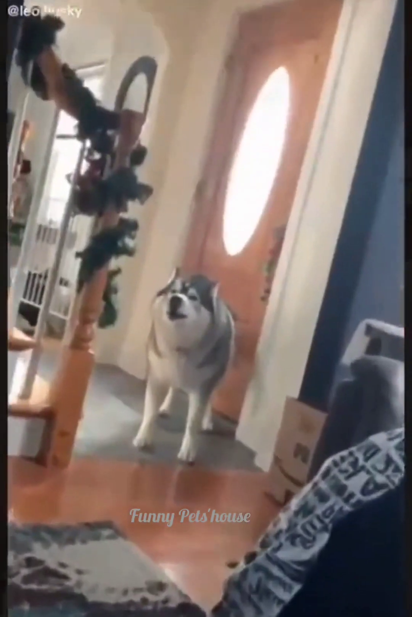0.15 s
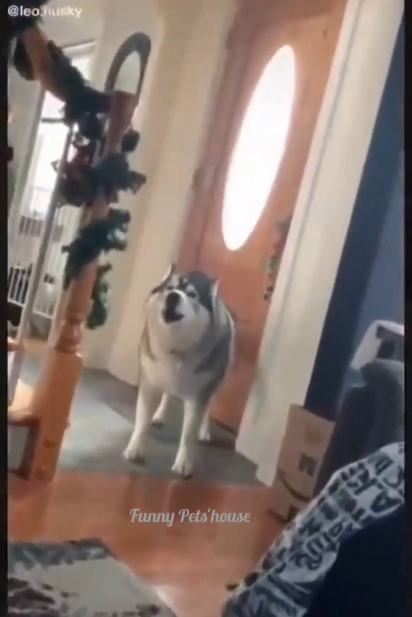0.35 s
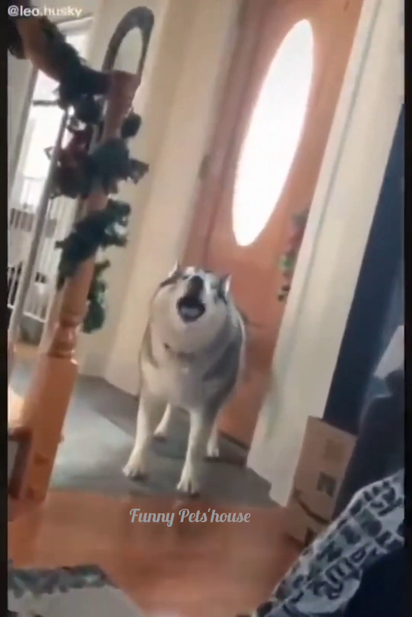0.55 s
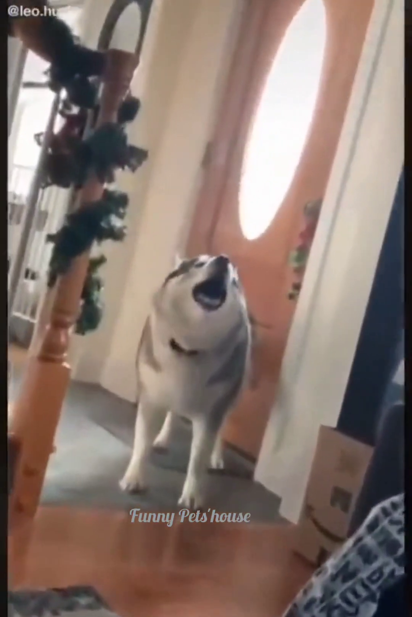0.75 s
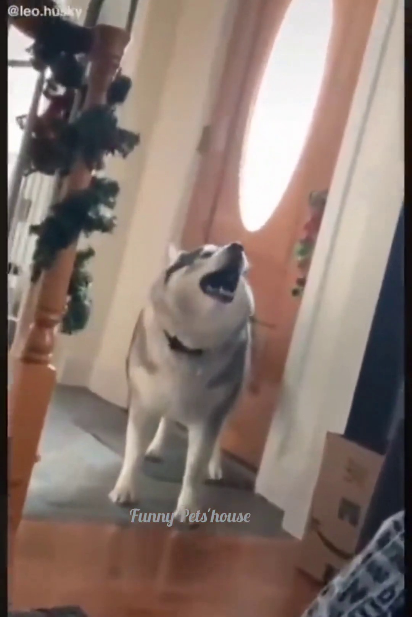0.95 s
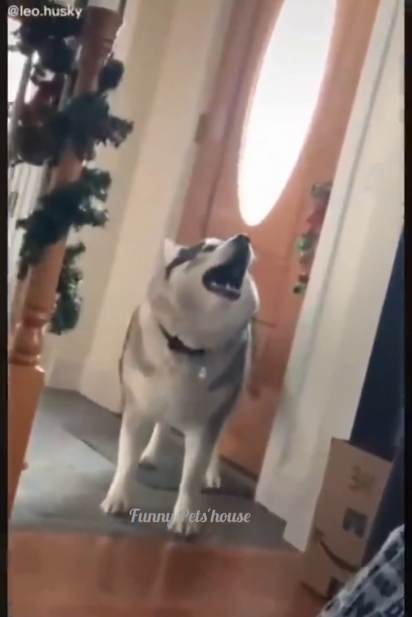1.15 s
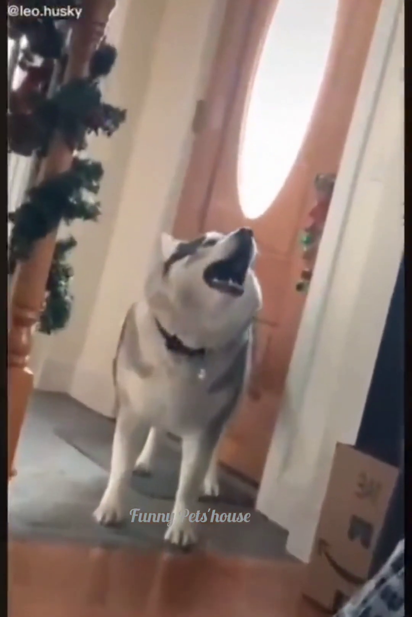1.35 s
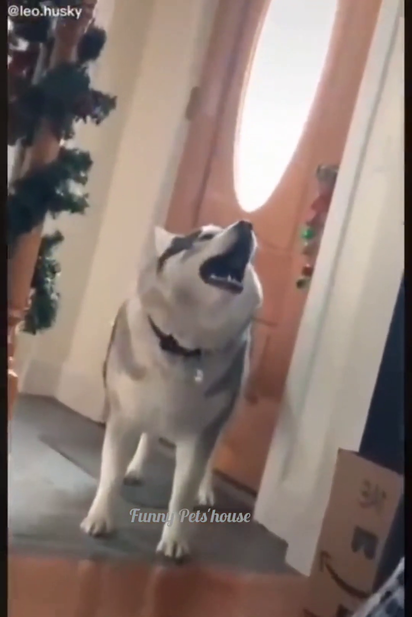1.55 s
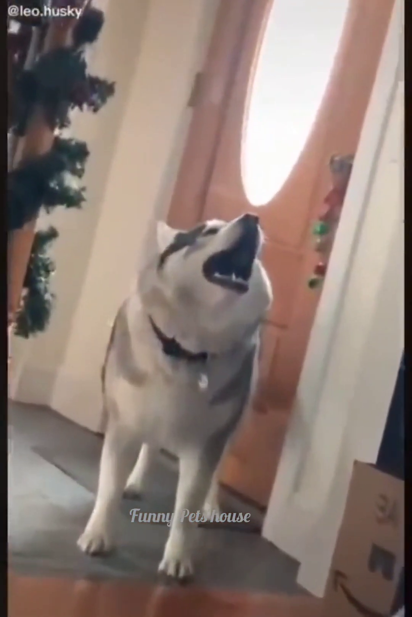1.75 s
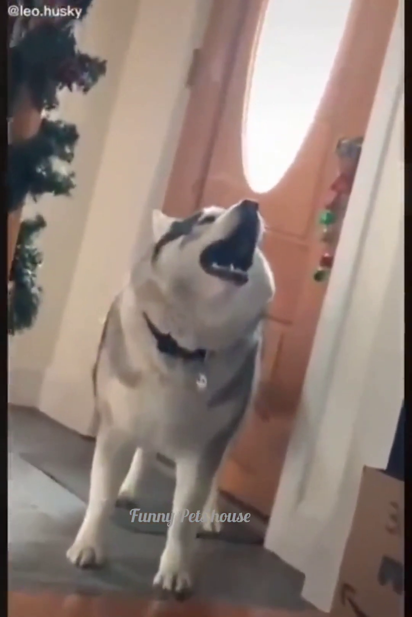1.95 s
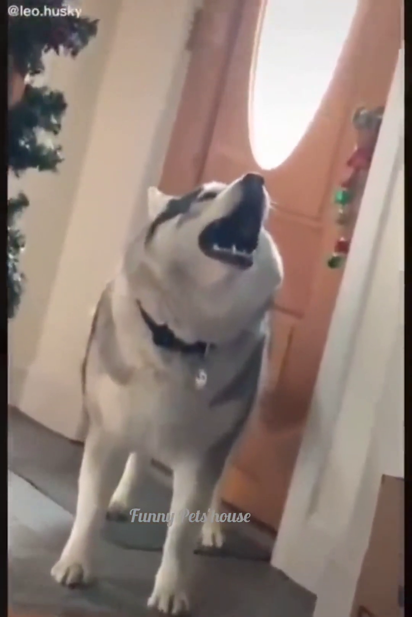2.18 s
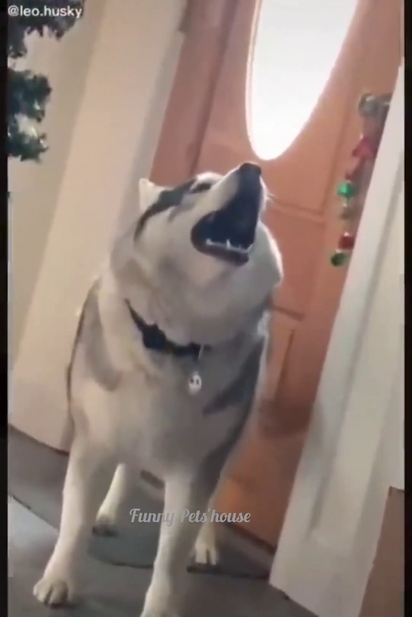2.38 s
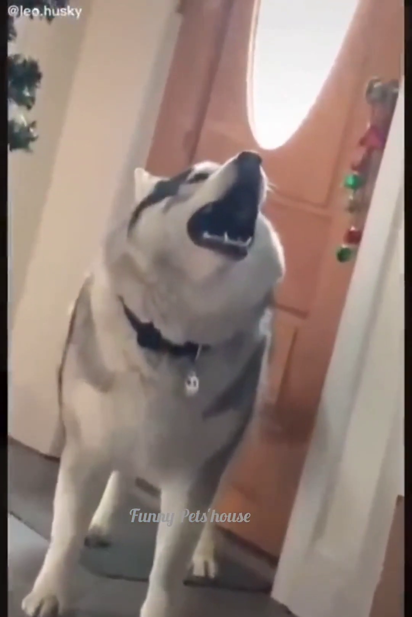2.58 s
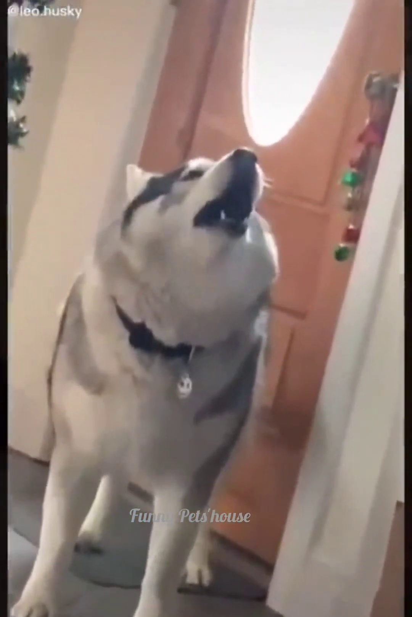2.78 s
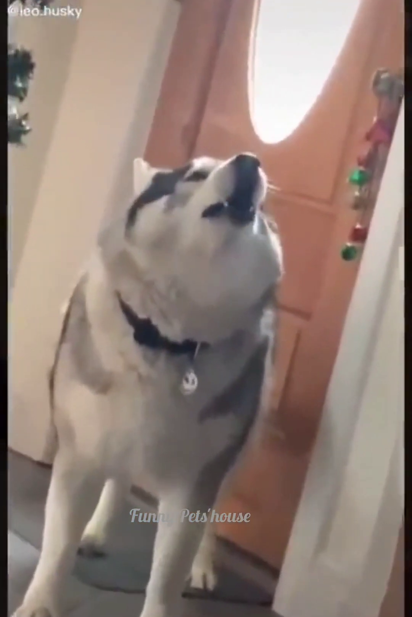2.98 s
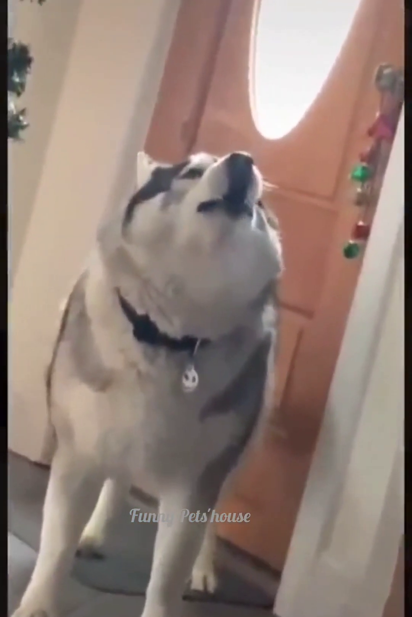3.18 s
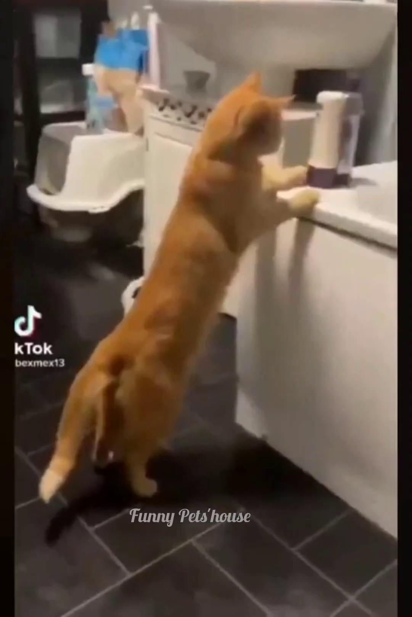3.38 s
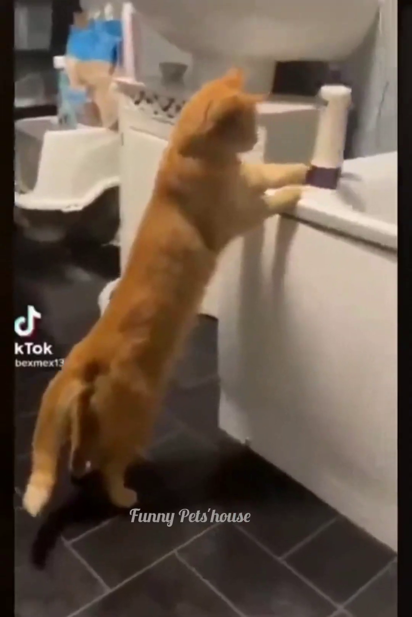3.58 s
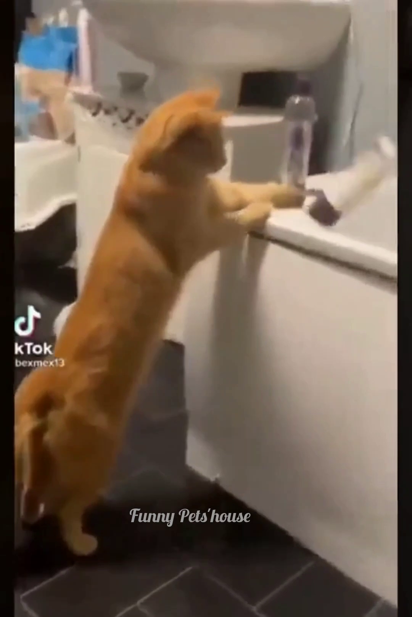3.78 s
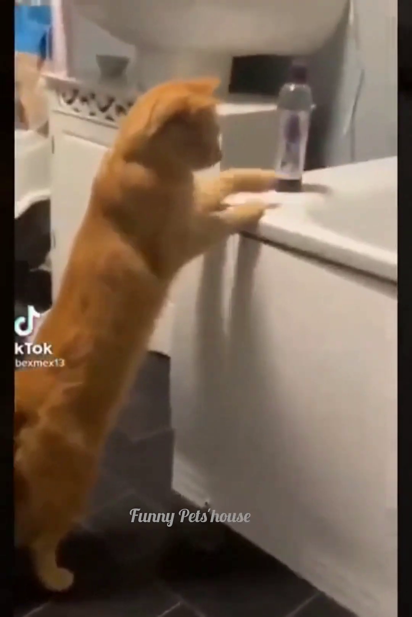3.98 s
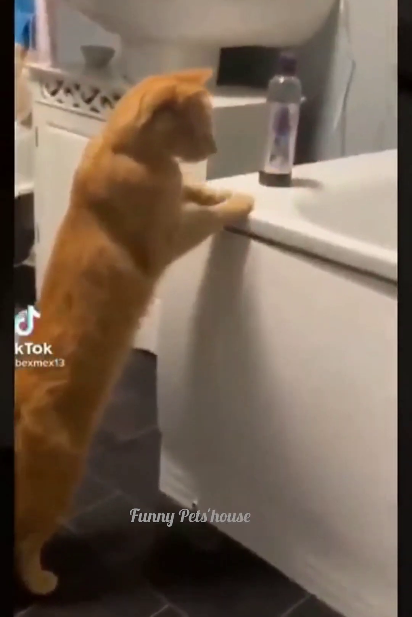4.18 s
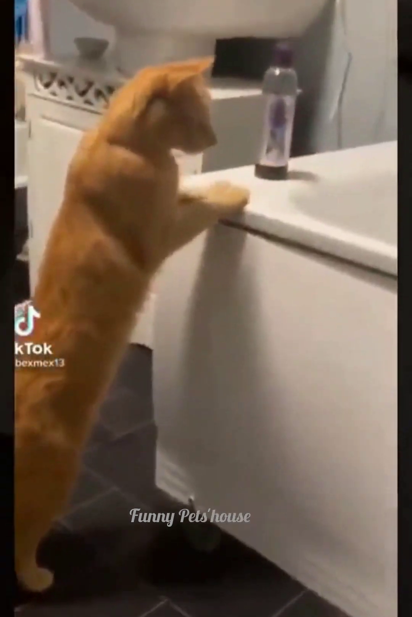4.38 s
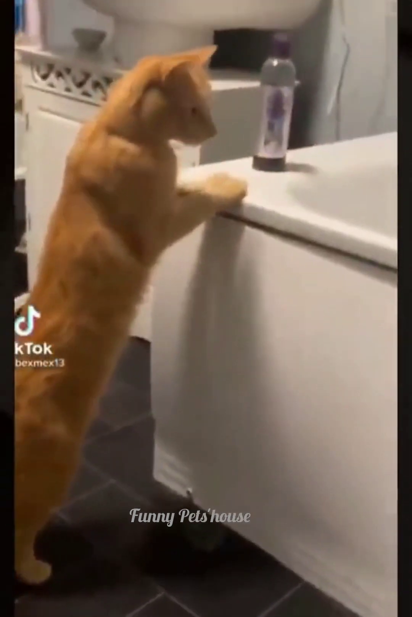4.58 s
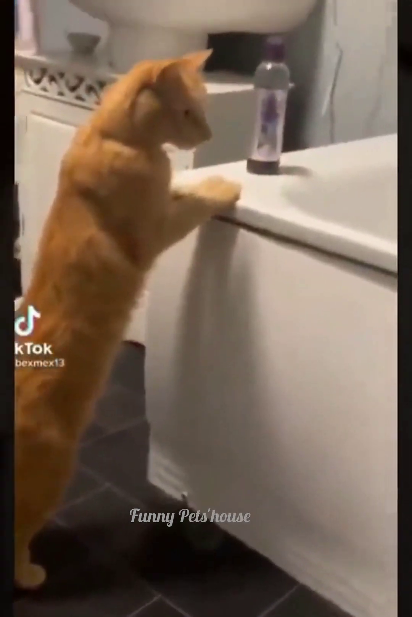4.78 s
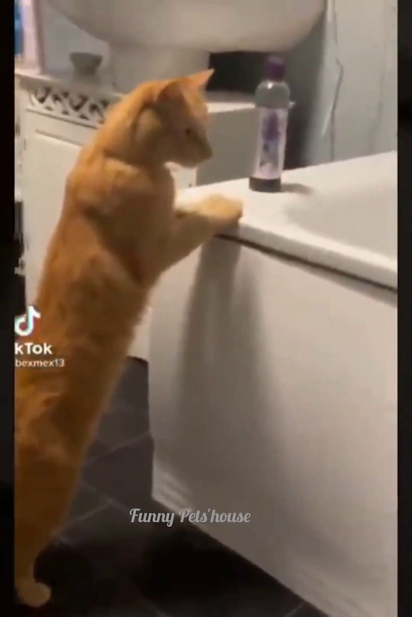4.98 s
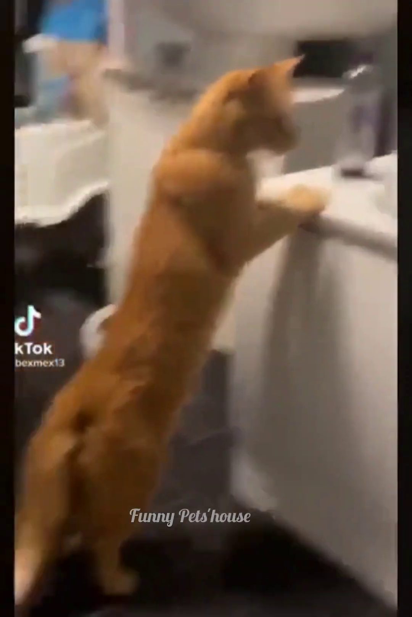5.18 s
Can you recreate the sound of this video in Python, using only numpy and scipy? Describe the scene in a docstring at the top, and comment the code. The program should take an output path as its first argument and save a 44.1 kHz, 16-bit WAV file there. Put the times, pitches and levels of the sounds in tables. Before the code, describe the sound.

Fairly close mono pickup indoors: a husky's low, wavering moan scoops up into a long, clear, almost whistling howl, slightly hoarser near the end, cracking and falling away. After a hard cut there is near silence and a faint scrape, then a sudden double bang as a plastic bottle hits a bathtub, a short resonant boom, more knocks and a fading hollow rattle.

```python
"""A husky in a hallway starts on a low moan, breaks up into one long, clear howl, cracks once and drops off.
Its voice is a stack of sine waves (partials) with shaped levels, plus breath noise and a hall echo.
Then, in a bathroom, a cat pushes a plastic bottle off the rim of a bathtub: it slides (uneven noise),
crashes into the hollow tub (noise bursts and fading tones), bounces and rolls about while the tub booms."""
import sys
import numpy as np
from scipy import signal
from scipy.fft import rfft, irfft, next_fast_len
from scipy.io import wavfile
from scipy.ndimage import map_coordinates

SR = 44100
rng = np.random.default_rng(int(sys.argv[2]) if len(sys.argv) > 2 else 0)


def transcribe(signal):
    """Save signal, clipped to [-1, 1], as a 16-bit WAV file at the path in sys.argv[1]."""
    frames = np.atleast_2d(signal).T
    limited = np.clip(frames, -1, 1)
    pcm = np.round(limited * 32767).astype(np.int16)
    wavfile.write(sys.argv[1], SR, pcm)


N = 231026
TIME = np.arange(N) / SR  # seconds
MOAN_START_S, HOWL_START_S, HOWL_END_S = 0.24, 0.594, 3.011

# Low noise of thuds and of the bathroom's rumble. Each row: frequency in Hz, relative level in dB.
THUD_SPECTRUM = [(25, -28), (50, -13), (72, -0.5), (125, -3), (200, -6.5), (400, -32), (900, -88)]


def amp(db):
    """Turn decibels into gain."""
    return 10 ** (np.asarray(db) / 20)


def unit(x):
    """Scale to an average (rms) strength of 1."""
    return x / np.sqrt(np.mean(x ** 2) + 1e-20)


def along(points, hz):
    """Read a table of (Hz, value) rows at any frequency, on a log axis."""
    f, v = np.transpose(points)
    return np.interp(np.log(hz + 1), np.log(f + 1), v)


def curves(rows):
    """Draw one curve over time for each column after the time."""
    s, *columns = np.transpose(rows)
    return [np.interp(TIME, s, column) for column in columns]


def between(start, stop, fade):
    """A gate that starts to open at start and is shut at stop."""
    return np.clip((TIME - start) / fade, 0, 1) * np.clip((stop - TIME) / fade, 0, 1)


def swell(s, width):
    """A smooth hump of height 1 around time s."""
    return np.exp(-((TIME - s) / width) ** 2)


def stroke(start, length, attack, sag, release):
    """A straight rise, a hold that sags, then a steeper release (both in dB a second)."""
    t = np.maximum(TIME - start, 0)
    return np.minimum(t / attack, 1) * amp(-sag * t - release * np.maximum(t - length, 0))


def wobble(rate):
    """A smooth random curve through rate random points a second."""
    coarse = np.linspace(0, N / SR, N // 32)
    points = rng.standard_normal(int(N * rate / SR) + 4)
    return np.interp(TIME, coarse, map_coordinates(points, [coarse * rate]))


def filtered(x, response):
    """Weight each frequency of x by the response."""
    m = next_fast_len(len(x) + SR // 2)
    return irfft(rfft(x, m) * response(np.fft.rfftfreq(m, 1 / SR)), m)[:len(x)]


def coloured(x, spectrum):
    """Give x the tone colour of a (Hz, dB) table, at rms 1."""
    return unit(filtered(x, lambda hz: amp(along(spectrum, hz))))


def noise(spectrum, size=N):
    """Random hiss or rumble of the given tone colour, at rms 1."""
    return coloured(rng.standard_normal(size), spectrum)


def resonate(x, modes):
    """Send x through a body with (Hz, width in Hz, dB) resonances, at rms 1."""
    def body(f):
        total = 0
        for k, (centre, width, db) in enumerate(modes):
            peak = 1j * f * width / (centre * centre - f * f + 1j * f * width)
            total = total + (-1) ** k * amp(db) * peak  # neighbours have opposite signs
        return total
    return unit(filtered(x, body))


def die_away(x, decay):
    """Let each frequency of x fade at its own speed, given as seconds to fall by 60 dB."""
    hz, t, z = signal.stft(x, SR, nperseg=256)
    fading = z * amp(-60 * t / along(decay, hz)[:, None])
    return signal.istft(fading, SR, nperseg=256)[1][:len(x)]


def ring(modes, t):
    """Tones of a struck body that each fade, at new random strengths for each blow."""
    total = 0
    for hz, db, t60 in modes:
        gain = amp(db + rng.normal(0, 3.55) - 60 * t / t60)
        total = total + gain * np.sin(2 * np.pi * (hz * t + rng.random()))
    return total


def add(track, s, sound):
    """Mix a sound into the track at time s."""
    part = track[round(s * SR):][:len(sound)]
    part += sound[:len(part)]


def hall_hum():
    """The quiet hum of the hall: low noise of slowly changing level."""
    # Each row: time in seconds, level in dB.
    hum_level = [(0, -63), (.7, -55), (1.2, -63.5), (2.9, -70), (3.37, -62)]
    # Each row: frequency in Hz, relative level in dB.
    hum_spectrum = [(20, -10.5), (70, -3), (150, -16.5), (450, -10), (850, -13), (1400, -29.5), (2100, -17),
                    (3000, -29), (14000, -47.5)]
    return amp(curves(hum_level)[0]) * noise(hum_spectrum)


def shuffles(thud_t60=0.3, rustle_t60=0.25, attack_s=0.01):
    """Dull knocks on the hall floor: fading low noise, each with a brief rustle of brighter noise."""
    # Each row: start in seconds, thud level in dB, rustle level in dB.
    bumps = [(0.649, -46.5, -85), (0.723, -50.5, -81.5), (3.086, -51, -49.5), (3.144, -58, -48)]
    # Tone colour of the knocks and of the rustles. Each row: frequency in Hz, relative level in dB.
    knock_spectrum = [(25, -5.5), (50, -5), (80, 0.5), (125, -7.5), (200, -4.5), (400, -1.5), (900, -30.5),
                      (2000, -62)]
    rustle_spectrum = [(300, -13.5), (1200, 3), (3500, -0.5), (10000, -17), (12500, -35.5)]
    out, t = np.zeros(N), np.arange(SR) / SR
    for s, thud_db, rustle_db in bumps:
        thud = amp(thud_db - 60 * t / thud_t60) * noise(knock_spectrum, size=SR)
        rustle = amp(rustle_db - 60 * t / rustle_t60) * noise(rustle_spectrum, size=SR)
        add(out, s, (thud + rustle) * (1 - np.exp(-t / attack_s)))
    return out


def hiss(flicker_db=3.5):
    """Air hisses past the teeth: it grows into the rising start of the howl, then fades to a faint hiss."""
    # Each row: frequency in Hz, relative level in dB.
    teeth_spectrum = [(2000, -25), (3000, -10), (4300, -21.5), (5500, -5), (7800, -1), (10500, -14.5),
                      (12000, -38), (14000, -61.5)]
    peak_s, peak_db, held_db = 0.74, -50.5, -70
    grows_db_per_s, fades_db_per_s = 38, 60
    t = TIME - peak_s
    strain = amp(peak_db + np.minimum(grows_db_per_s * t, -fades_db_per_s * t))
    level = (strain + amp(held_db)) * amp(flicker_db * wobble(14))
    return level * noise(teeth_spectrum) * between(MOAN_START_S, HOWL_END_S, 0.14)


def glides(scoop_s=0.37, scoop_curve=2.03, drop_s=0.024):
    """How much of the opening scoop is still to go, and how far the closing drop has come, 0-1."""
    # the scoop rises ever more slowly; the drop falls ever faster as the air runs out
    scoop = np.clip(1 - (TIME - HOWL_START_S) / scoop_s, 0, 1) ** scoop_curve
    drop = np.exp(np.minimum(TIME - HOWL_END_S, 0) / drop_s)
    return scoop, drop


def breaks():
    """Pitch dip, roughness and rasp where the vocal folds lose their beat: quick to come, slower to heal."""
    # Each row: time in seconds, half width in seconds, recovery in seconds, pitch dip in Hz
    # (negative: a rise), added roughness 0-1, added rasp in dB.
    break_rows = [(.595, 0.027, 0.047, 1.5, 0.4, -29.5), (1.61, .018, .06, -11.5, 0.02, -55.5),
                  (2.434, .018, .028, 52, .3, -28.5), (2.995, .014, .025, 1, 0.47, -36)]
    # between breaks the voice is nearly clean, slowly getting hoarser
    held_rough, held_rasp_db, rasp_grows_db_per_s = 0.019, -73.5, 7.5
    dip, rough = np.zeros(N), np.full(N, held_rough)
    rasp = amp(held_rasp_db + rasp_grows_db_per_s * (TIME - HOWL_START_S))
    for s, width, recovery, dip_hz, roughness, rasp_db in break_rows:
        hump = swell(s, width)
        shape = np.where(TIME < s, hump, np.exp(-np.abs(TIME - s) / recovery))
        dip = dip + dip_hz * hump
        rough = rough + roughness * shape
        rasp = rasp + amp(rasp_db) * shape
    return dip, rough, rasp


def fold_phase(pitch, rough, jitter, tremor):
    """Swing of the vocal folds: a slight tremor always, fast jitter when rough."""
    shake = tremor * wobble(35) + jitter * rough * wobble(250)
    return 2 * np.pi * np.cumsum(pitch * (1 + shake)) / SR


def throat_air():
    """Tone colour of the turbulent air in the throat."""
    # Each row: frequency in Hz, relative level in dB.
    return [(120, -73.5), (280, -37.5), (390, -16), (750, 7), (1100, 7), (1500, -1.5), (1900, 3.5),
            (2300, 9.5), (3000, -19), (3800, -20.5), (4400, -27), (6500, -18.5), (11000, -24),
            (14000, -53.5)]


def moan(air_db=-14, patchy_db=5.0, end_s=0.63, handover_s=0.048):
    """Low register: many partials slide through the throat resonances while the lips part."""
    # Each row: time in seconds, pitch in Hz.
    moan_pitch = [(.235, 365), (.266, 277), (.33, 306), (.45, 317), (.51, 337), (.57, 375), (.585, 405),
                  (.61, 415)]
    # Each row: time in seconds, level in dB.
    moan_level = [(0.24, -40), (0.268, -36), (0.382, -25.5), (0.452, -42.5), (0.474, -25), (0.512, -30),
                  (0.532, -17), (0.544, -20), (0.6, -20)]
    # Throat with the mouth half shut. Each row: frequency in Hz, relative level in dB.
    throat = [(280, -14.5), (390, -8.5), (620, 5.5), (760, 4), (940, -9), (1200, -7.5), (1550, -27),
              (1900, -22.5), (2200, -5.5), (2500, -22.5), (3100, -31), (3500, -41.5), (4200, -64),
              (5500, -42.5), (7800, -36), (10500, -48.5), (12500, -71)]
    # Each row: frequency in Hz, share of the lip resonance 0-1.
    lip_share = [(850, 0.14), (1130, 1), (1450, 0.018)]
    pitch, = curves(moan_pitch)
    db, = curves(moan_level)
    # the folds start out rough and chesty, then settle
    onset_rough, onset_settle_s, onset_chest_db = 0.4, 0.053, 16.5
    onset = swell(MOAN_START_S, onset_settle_s)
    rough = onset_rough * onset + breaks()[1]
    lips_db = 18.5 * swell(0.29, 0.03)  # the lips ring briefly as they part
    phase = fold_phase(pitch, rough, jitter=0.066, tremor=0.002)
    gains = []
    for k in range(1, 34):
        body_db = along(throat, k * pitch) + lips_db * along(lip_share, k * pitch)
        gains.append(amp(body_db + patchy_db * np.log10(k) * wobble(25)))
    gains[0] = gains[0] * amp(onset_chest_db * onset)
    voice = sum(g * np.sin(k * phase) for k, g in enumerate(gains, 1))
    voice = voice / np.sqrt(sum(g * g for g in gains) / 2)  # the level curve alone sets the loudness
    air = amp(air_db) * rough * noise(throat_air())
    gate = between(MOAN_START_S, np.inf, 0.0053) * between(0, end_s, handover_s)
    return amp(db) * (voice + air) * gate


def howl(air_db=-9, hiss_db=-68, choke_db=-10, waver=0.35, fray=9, patchy_db=4.0, flutter_db=6):
    """High register: clean partials; at a break, tones halfway between them and turbulent air join in."""
    # Each row: time in seconds, pitch of the held note in Hz (before scoop, drop and breaks).
    howl_pitch = [(1.08, 764.5), (1.25, 775), (1.57, 777), (1.73, 784.5), (2.1, 780), (2.25, 773.5),
                  (2.56, 767), (2.67, 771.5), (2.88, 765.5)]
    # Each row: time in seconds, basic level in dB of the fundamental, the third and the fourth partial.
    partial_levels = [(0.6, -10, -37, -43.5), (0.62, -15, -31.5, -47.5), (0.71, -19, -23.5, -26.5),
                      (0.74, -14.5, -39, -39.5), (0.77, -15, -19.5, -35), (0.83, -20.5, -17, -42.5),
                      (1.07, -12.5, -21, -44.5), (1.22, -15.5, -19.5, -54), (1.54, -17, -19, -49),
                      (1.74, -24, -23.5, -51), (2.04, -19.5, -19.5, -35.5), (2.4, -17, -24, -43),
                      (2.42, -23.5, -25.5, -37), (2.64, -18.5, -25.5, -45), (2.86, -20.5, -27, -43),
                      (2.99, -34, -33.5, -43)]
    # The second partial fades where sound waves cancel in the hall.
    # Each row: time in seconds, half width in seconds, depth in dB.
    nodes = [(1.02, .04, 7.5), (1.175, 0.046, 14), (1.39, 0.073, 18), (1.64, 0.013, 13.5), (2.259, .03, 17),
             (2.559, 0.12, 8), (2.88, 0.12, 14.5)]
    # Tone colour of the howl's upper partials. Each row: frequency in Hz, relative level in dB.
    upper_colour = [(3100, 0.5), (3850, 3.5), (4650, -21), (5450, -5.5), (6200, 1.5), (7050, -3),
                    (7800, -1.5), (8600, -5.5), (9400, -2.5), (10100, -13.5), (10850, -7), (11700, -17),
                    (13200, -20), (15000, -33)]
    # Throat for the tones halfway between the partials. Each row: frequency in Hz, relative level in dB.
    half_tones = [(260, -18), (385, -17.5), (800, 1), (1130, 1), (1900, 1.5), (2700, -1.5), (3500, -15.5),
                  (4300, -27), (6500, -21.5), (11000, -22.5), (14000, -53)]
    scoop_hz, drop_hz = 207.7, 143.3  # the voice scoops up to the note and at last falls off it
    scoop, drop = glides()
    dip, rough, rasp = breaks()
    pitch = curves(howl_pitch)[0] - scoop_hz * scoop - drop_hz * drop - dip
    age = TIME - HOWL_START_S

    first_db, third_db, fourth_db = curves(partial_levels)
    first_db = first_db + 12 * drop  # the fundamental flares in the closing drop
    # the fourth partial rings as the scoop carries it through this throat resonance
    throat_hz, throat_width_hz, throat_db = 2350, 170, 17
    fourth_db = fourth_db + throat_db * np.exp(-((4 * pitch - throat_hz) / throat_width_hz) ** 2)
    # the second partial sags as the dog tires, is weak in the scoop and rings out in the drop
    second_db = -27 - 0.46 * age - 15.5 * scoop + 9 * drop
    second_db = second_db - sum(db * swell(s, width) for s, width, db in nodes)
    # partials above the fourth tire faster and are muffled while the mouth opens and closes
    upper_db = -36.5 - 3.5 * age - 13 * (scoop ** 2 + drop)
    upper_db = upper_db + 3.5 * swell(0.83, 0.07)  # the dog pushes hardest midway up the scoop

    phase = fold_phase(pitch, rough, jitter=0.07, tremor=0.00043)
    levels = [first_db, second_db, third_db, fourth_db]
    low = np.sqrt(2) * sum(amp(db) * np.sin(k * phase) for k, db in enumerate(levels, 1))
    # the faint high partials waver, are the first to fray and stay ragged until the note is reached
    scoop_fray = 0.9
    ragged = np.minimum(fray * rough + scoop_fray * scoop, 1)
    colour_rise = 0.28  # the tone colour climbs in frequency as the mouth opens with the scoop
    upper = 0
    for k in range(5, 19):
        colour_db = along(upper_colour, k * pitch / (1 - colour_rise * scoop))
        stray = waver * wobble(45) + ragged * wobble(220)
        upper = upper + amp(colour_db + patchy_db * wobble(6.89)) * np.sin(k * phase + stray)
    # alternate strong and weak cycles of the folds put tones halfway between the partials
    halves = 0
    for k in range(15):
        half_db = along(half_tones, (k + 0.5) * pitch) + flutter_db * wobble(60)
        halves = halves + amp(half_db) * np.sin((k + 0.5) * phase)
    air = coloured(rng.standard_normal(N) * (2 + np.cos(phase)), throat_air())  # puffs with the folds

    clean = amp(choke_db * rough) * (low + amp(upper_db) * unit(upper))
    voice = clean + rasp * (unit(halves) + amp(air_db) * air) + amp(hiss_db) * air
    attack_s, release_s = 0.022, 0.012
    gate = between(HOWL_START_S - attack_s / 2, np.inf, attack_s) * between(0, HOWL_END_S, release_s)
    return voice * gate


def hall_echo(dog, unsteady_weight=2.8, wet_db=-13, extra_db=6):
    """Echo of the hall, a fading noise tail; heard most while the voice slides or breaks."""
    # Each row: frequency in Hz, seconds to fall by 60 dB.
    hall_decay = [(150, 0.24), (770, 0.66), (2500, 0.33), (8000, 0.6), (14000, 0.04)]
    unsteady = np.minimum(unsteady_weight * (sum(glides()) + breaks()[1]), 1)
    tail = die_away(rng.standard_normal(SR), hall_decay)
    tail = np.pad(tail, (SR // 150, 0))  # the echo starts 1/150 s late
    sent = dog * amp(wet_db + extra_db * unsteady)
    return signal.fftconvolve(sent, tail / np.linalg.norm(tail))[:N]


def hallway():
    """The hall's hum and shuffles, the dog and its echo, shut off together at the end."""
    dog = moan() + howl() + hiss()
    return (hall_hum() + shuffles() + dog + hall_echo(dog)) * between(-1, 3.372, 0.042)


def rolling(drum_trim_db=-2, rattle_trim_db=-4.0, scrape_trim_db=-1, rumble_db=-7, bump_db=0.5, drift=1.0):
    """Small uneven contacts of the moving bottle drum the tub, rattle its panels and scrape its skin."""
    # The bottle tips, slides and rolls. Each row: start in seconds, length in seconds,
    # drumming, rattle and scrape in dB before the trims.
    movements = [(3.58, 0.18, -62.5, -59, -67), (3.735, 0.15, -62, -59.5, -73.5),
                 (3.891, 0.04, -49, -52, -68), (3.923, 0.27, -37, -42.5, -63.5),
                 (4.291, 0.092, -27.5, -29, -41.5), (4.395, 0.17, -24, -24.5, -49),
                 (4.596, 0.11, -30, -38.5, -42.5), (4.728, 0.095, -34.5, -38, -43.5),
                 (4.884, 0.053, -40, -65, -50.5), (4.962, 0.11, -40.5, -51, -47),
                 (5.08, .15, -37.5, -38, -56.5)]
    # Low tones that rolling keeps alive in the tub. Each row: frequency in Hz, relative level in dB.
    hollow_tones = [(127, -16), (210, -5), (232, -1), (285, -15.5)]
    # Rattling panels. Each row: frequency in Hz, width in Hz, relative level in dB.
    panels = [(385.5, 36, 6), (457, 36, 5), (522, 130, -5), (797, 105, -3.5), (915, 154, -4),
              (1295, 64, -6), (1378, 40, -8.5), (1850, 790, -15)]
    # Tone colour of the low rumble and of the scrape. Each row: frequency in Hz, relative level in dB.
    rumble_spectrum = [(30, -19.5), (75, 0.5), (150, 2), (260, 3.5), (400, -4.5), (560, -23.5), (900, -54)]
    scrape_spectrum = [(1200, 5.5), (2400, 5), (4200, 3), (6000, -2), (9500, -7), (11000, -26.5)]
    # each movement swells, slackens and rings out
    attack_s, sag_db_per_s, release_db_per_s = 0.036, 27, 115
    moves = np.array([stroke(s, length, attack_s, sag_db_per_s, release_db_per_s)
                      for s, length, *_ in movements])
    strengths = amp([dbs for _, _, *dbs in movements]).T
    drumming, rattling, scraping = np.sqrt(strengths ** 2 @ moves ** 2)  # overlaps add as power
    bumps = unit(amp(bump_db * wobble(90)))
    tones = 0
    for hz, db in hollow_tones:
        tone = np.sin(2 * np.pi * hz * TIME + drift * wobble(20))
        tones = tones + amp(db + 4.0 * wobble(25)) * tone
    drum = amp(drum_trim_db) * unit(tones) + amp(rumble_db) * noise(rumble_spectrum)
    rattle = amp(rattle_trim_db) * resonate(bumps * rng.standard_normal(N), panels)
    scrape = amp(scrape_trim_db) * bumps * noise(scrape_spectrum)
    return drumming * drum + rattling * rattle + scraping * scrape


def boom(level_db=-17, shake_db=2, scatter=0.64):
    """The bottle skidding down into the tub makes its wall sing: one unsteady tone that sinks and settles."""
    start_s, end_s, attack_s, sag_db_per_s, release_db_per_s = 4.14, 4.305, 0.035, 27, 500
    high_hz, low_hz, sink_at_s, sink_s = 483.5, 399, 4.191, 0.0091
    sunk = (1 + np.tanh((TIME - sink_at_s) / sink_s / 2)) / 2
    pitch = high_hz + (low_hz - high_hz) * sunk
    tone = np.sin(2 * np.pi * np.cumsum(pitch) / SR + scatter * wobble(120))
    skid = stroke(start_s, end_s - start_s, attack_s, sag_db_per_s, release_db_per_s)
    return np.sqrt(2) * amp(level_db + shake_db * wobble(90)) * tone * skid


def crash(attack_s=0.011, thud_t60=0.39, crackle_db=0.5):
    """Every blow clatters off the tiles, rings tub and bottle and thuds through the floor."""
    # The bottle strikes the tub. Each row: time in seconds, clatter, tub ring, low thud
    # and bottle ring in dB.
    blows = [(4.084, -15.5, -35, -27, -41), (4.105, -19.5, -39, -29.5, -51),
             (4.144, -15.5, -21, -25.5, -37), (4.171, -23, -24.5, -28, -42),
             (4.214, -33.5, -29.5, -29, -36), (4.247, -30, -28.5, -38, -44),
             (4.379, -30.5, -27.5, -34, -48), (4.426, -34, -35, -32, -31), (4.488, -39, -40, -45, -26)]
    # Tones of the tub with the bottle on it, then of the bottle.
    # Each row: frequency in Hz, average level in dB, seconds to fall by 60 dB.
    tub_modes = [(71.6, -5.5, 0.94), (115.2, -6, 0.93), (173, -16, 0.51), (199.7, -3, 0.87),
                 (294, 0.5, 0.35), (386, -16, 0.34), (452, -7, 0.2), (498, 0, 0.36), (732, -12, 0.2),
                 (1133, -6, 0.22)]
    bottle_modes = [(533, -5, 0.26), (1034, -5, 0.27), (1313, -5, 0.77), (1383, -10, 0.57)]
    # Each row: frequency in Hz, relative level in dB.
    clatter_spectrum = [(88, -25), (150, -15), (263, -2.5), (478, -5.5), (645, -8), (885, -5.5), (949, -11),
                        (1020, -9.5), (2400, -16.5), (4380, -24.5), (10000, -42), (13000, -71),
                        (22000, -120)]
    # Each row: frequency in Hz, seconds to fall by 60 dB.
    clatter_decay = [(200, 0.74), (1000, 0.42), (3000, 0.45), (9000, 0.48)]
    out, t = np.zeros(N), np.arange(SR) / SR
    for s, clatter_db, tub_db, thud_db, bottle_db in blows:
        crackle = unit(amp(crackle_db * wobble(298.3)[:SR]))  # the bottle chatters against the wall
        clatter = amp(clatter_db) * crackle * die_away(noise(clatter_spectrum, size=SR), clatter_decay)
        thud = amp(thud_db - 60 * t / thud_t60) * noise(THUD_SPECTRUM, size=SR)
        rings = amp(tub_db) * ring(tub_modes, t) + amp(bottle_db) * ring(bottle_modes, t)
        soft_start = 1 - np.exp(-(t / attack_s) ** 2)
        add(out, s - attack_s, (clatter + thud + rings) * soft_start)  # begins early by the attack
    return out


def bathroom(floor_db=-79, top_hz=10200):
    """The falling bottle over a faint steady rumble, with no top treble."""
    sound = amp(floor_db) * noise(THUD_SPECTRUM) + rolling() + boom() + crash()
    return filtered(sound, lambda hz: 1 / np.sqrt(1 + (hz / top_hz) ** 120))


def scene():
    """The hallway, then the bathroom, as one channel."""
    return (hallway() + bathroom())[None]


def record(dry, top_hz=15500):
    """Nothing is kept above the band limit."""
    return np.array([filtered(channel, lambda hz: hz < top_hz) for channel in dry])


dry = scene()
out = record(dry)
transcribe(out)
```